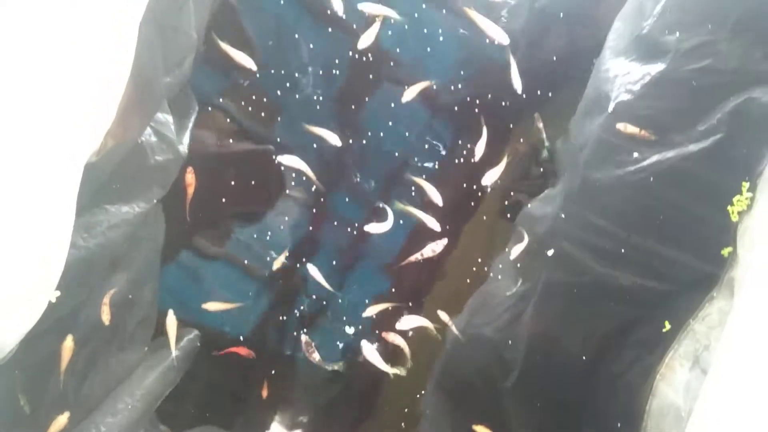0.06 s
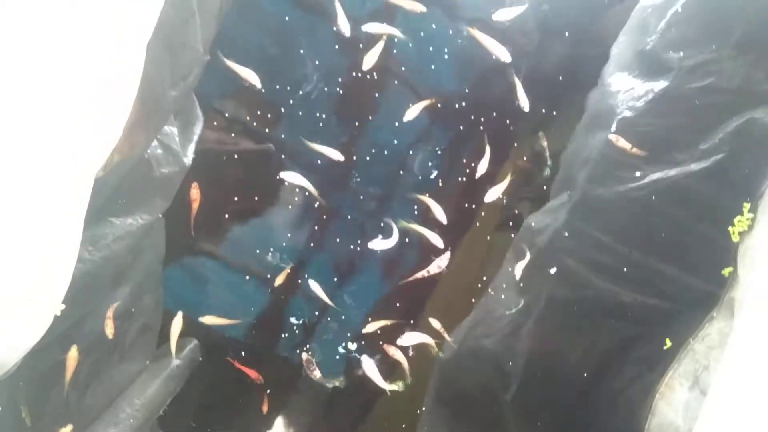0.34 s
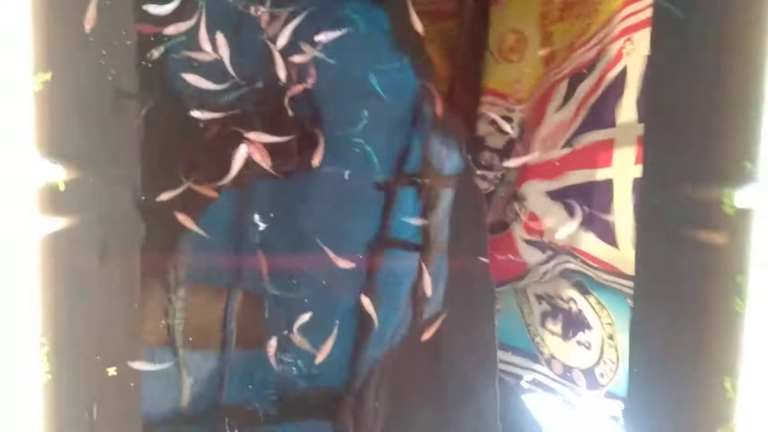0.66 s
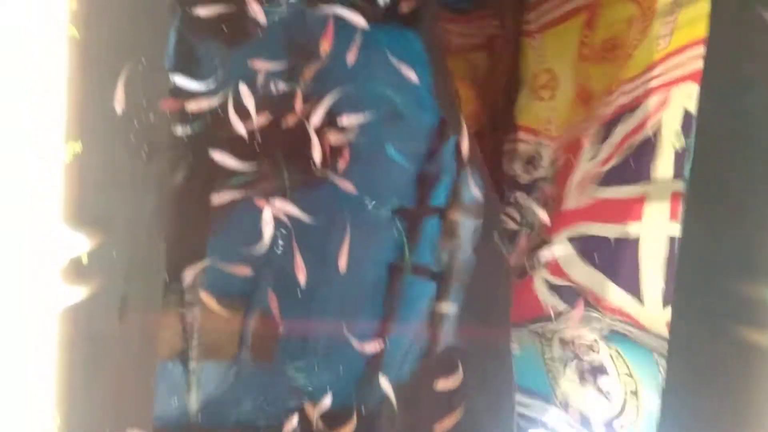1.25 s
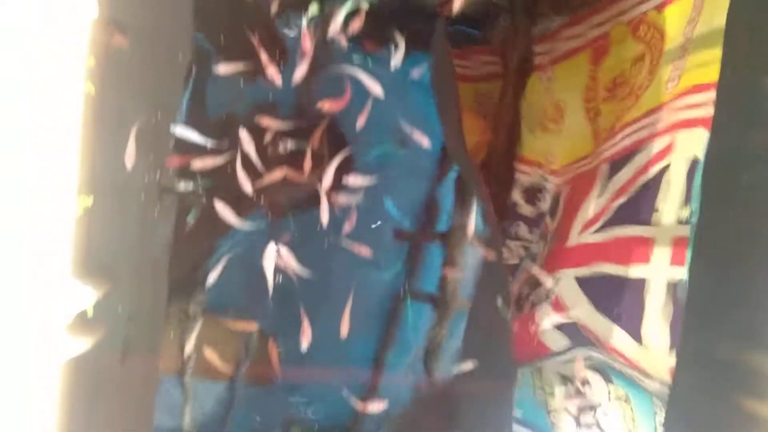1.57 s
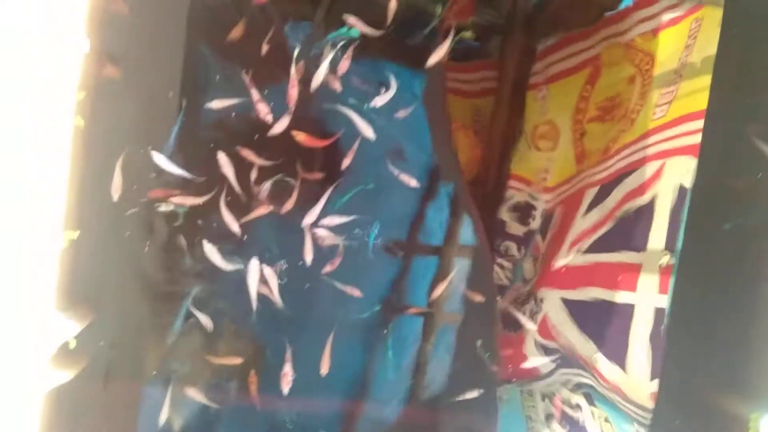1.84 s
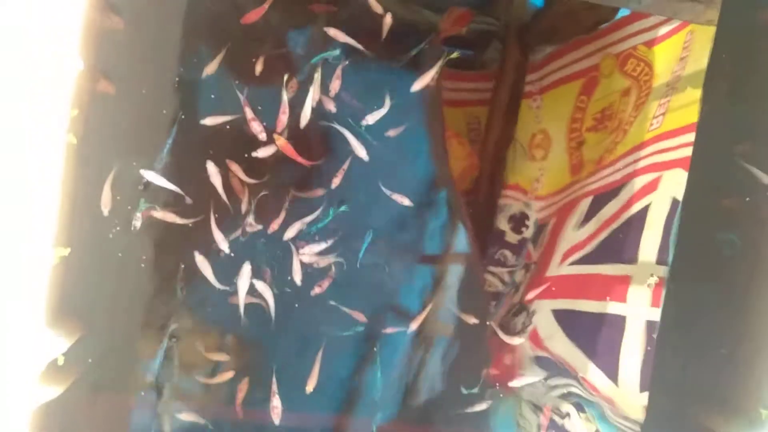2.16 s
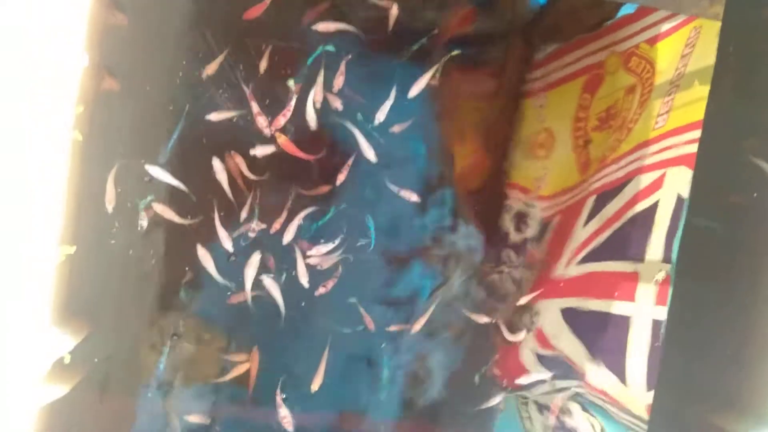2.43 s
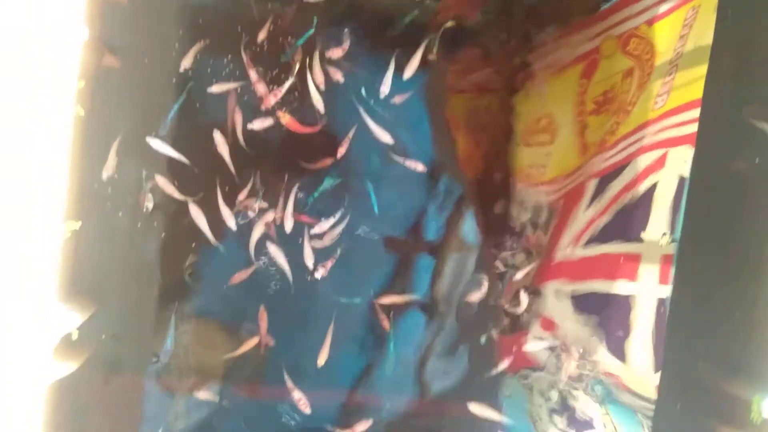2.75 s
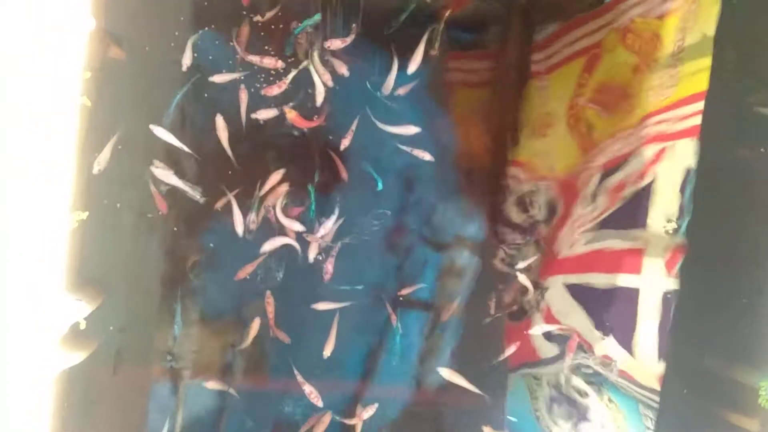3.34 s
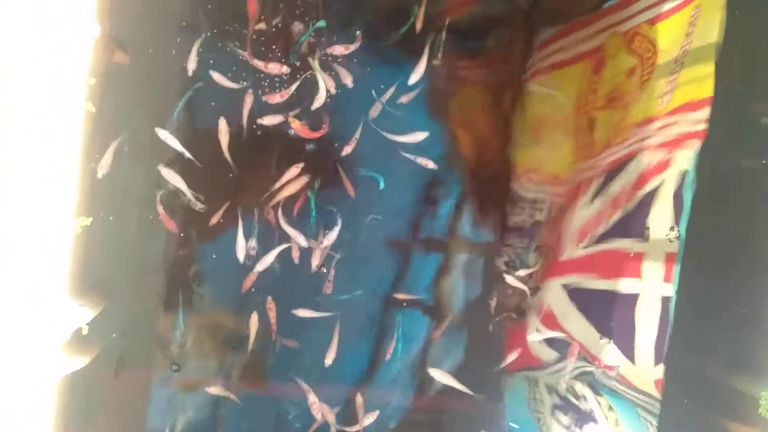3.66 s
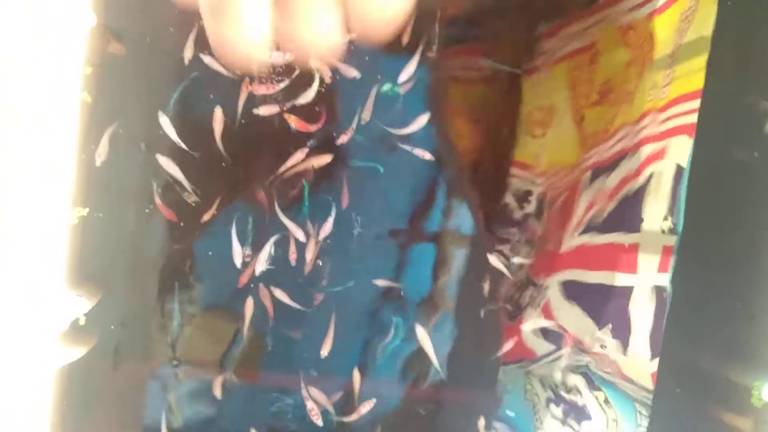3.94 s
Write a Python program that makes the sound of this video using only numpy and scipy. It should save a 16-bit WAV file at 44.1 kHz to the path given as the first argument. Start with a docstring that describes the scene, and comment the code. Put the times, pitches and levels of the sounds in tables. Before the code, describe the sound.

Hissing water splatters in a fish tank, with many small splashes and one hollow gulp.

```python
"""Water splattering by a fish tank

A steady wash of mist and tiny ringing droplets runs under short, bright splashes and one hollow
gulp of air bubbles. The tank's resonances colour the water and nearby walls answer it.
A low rumble and a faint motor hum lie underneath. The highest treble is cut away, and the
sound drops out for a tenth of a second near the start."""
import sys
import numpy as np
from scipy import signal
from scipy.fft import rfft, irfft, next_fast_len
from scipy.io import wavfile
from scipy.ndimage import uniform_filter1d, map_coordinates

SR = 44100
rng = np.random.default_rng(int(sys.argv[2]) if len(sys.argv) > 2 else 0)


def output_pcm(signal):
    """Save a mono or channel-first signal as 16-bit PCM at the path in sys.argv[1].

    Samples are clipped to [-1, 1] before scaling.
    """
    pcm = np.clip(np.atleast_2d(signal).T, -1, 1) * 32767
    wavfile.write(sys.argv[1], SR, np.round(pcm).astype(np.int16))


N = 176400
TOP_HZ = 8005  # ceiling of the mist and of the whole mix


def amp(db):
    """Decibels to gain."""
    return 10 ** (np.asarray(db) / 20)


def unit(x):
    """Scale x to an rms of 1."""
    return x / np.sqrt(np.mean(x ** 2) + 1e-20)


def eq_gain(points, hz):
    """Gain of an EQ curve drawn through (frequency [Hz], level [dB]) points on a log axis."""
    point_hz, point_db = np.transpose(points)
    return amp(np.interp(np.log(hz + 1), np.log(point_hz + 1), point_db))


def wobble(knots_per_s):
    """A smooth random curve for slow drift or quick flutter."""
    position = np.arange(N) * knots_per_s / SR + 2
    return map_coordinates(rng.standard_normal(400), [position], mode="mirror")


def filtered(x, response):
    """Shape the spectrum of x with response(hz)."""
    padded = next_fast_len(len(x) + 8192)
    hz = np.fft.rfftfreq(padded, 1 / SR)
    return irfft(rfft(x, padded) * response(hz), padded)[:len(x)]


def patchy(x, depth_db):
    """Make the tone flicker with random patches of gain in time and frequency."""
    spectrum = signal.stft(x, nperseg=512)[2]
    patches = uniform_filter1d(rng.standard_normal(spectrum.shape), size=8, axis=0)
    patches = uniform_filter1d(patches, size=9, axis=1)
    return signal.istft(spectrum * amp(depth_db * unit(patches)), nperseg=512)[1][:N]


def spray(drops_db, drops_per_s=2900, decay_cycles=5, size_spread_db=3.0):
    """Fine mist plus droplets, each a tiny damped ring; drops_db sets them against the mist."""
    mist = unit(filtered(rng.standard_normal(N), lambda hz: hz < TOP_HZ))
    when, pitch, size = rng.random((12000, 3))[:int(drops_per_s * N / SR)].T
    drop_hz = (500 + 7300 * pitch)[:, None]
    ring_samples = np.arange(400)
    cycles = drop_hz * ring_samples / SR
    size_db = -size_spread_db * np.log(np.maximum(size, .01))  # many small drops, a few big ones
    gain = amp(size_db)[:, None] * np.sqrt(drop_hz)  # short, high rings carry as much energy as low ones
    rings = gain * np.sin(2 * np.pi * cycles) * np.exp(-cycles / decay_cycles)
    positions = (when * N).astype(int)[:, None] + ring_samples
    drops = np.bincount(positions.ravel(), rings.ravel())[:N]
    return unit(mist + amp(drops_db) * unit(drops))


def wash():
    """The steady run of water: a misty spray that swells gently and flutters a little."""
    # tone of the running water: (frequency [Hz], relative level [dB])
    tone = [(150, -15), (300, -0.5), (600, 1), (800, -1), (1050, -2), (1400, 0.07), (1950, -2), (2800, 1),
            (3750, -4), (4400, 1), (5700, -1.7), (6500, -1.5), (8000, 0)]
    # swell of the running water: (time [s], level [dB])
    swell = [(0, -54), (.17, -57.5), (.3, -53.5), (0.471, -57.5), (.7, -54), (1.15, -53), (1.31, -55),
             (1.45, -54), (2.1, -54.5), (2.18, -54.5), (2.4, -53), (2.57, -54.5), (2.82, -54.5),
             (2.95, -54), (3.15, -55), (3.45, -52.5), (3.63, -54.5), (4, -53.5)]
    water = patchy(spray(drops_db=-5), depth_db=1.3)
    water = unit(filtered(water, lambda hz: eq_gain(tone, hz)))
    swell_db = np.interp(np.arange(N) / SR, *np.transpose(swell))
    flutter_db = wobble(knots_per_s=35)
    return water * amp(swell_db + flutter_db)


def splashes(attack_s=0.00095, release_s=0.021):
    """Each splash is a short shower of droplets around one pitch."""
    # splashes: (start [s], time until release [s], relative level [dB], centre [Hz], width [octaves])
    hits = [ (0, 0.016, -59, 4020, 0.36), (.055, 0.03, -56.5, 5760, 0.35), (.1, 0.02, -57.5, 2330, 0.16),
            (.193, 0.02, -51, 5100, 0.22), (.193, 0.02, -59.5, 1410, 0.23), (.27, 0.021, -62.5, 4800, 0.41),
            (.335, 0.061, -52.5, 5830, 0.41), (.405, 0.017, -61, 2880, 0.23),
            (.502, 0.018, -56.5, 6400, 0.16), (.66, 0.056, -52.5, 4550, 0.68),
            (.817, 0.024, -51, 3450, 0.5), (.895, 0.051, -56, 4500, 0.7), (.975, 0.009, -53, 5500, 0.83),
            (1.025, 0.03, -56, 3070, 0.25), (1.09, 0.051, -58, 5000, 0.5), (1.143, 0.024, -48, 4870, 1),
            (1.24, 0.023, -57, 5970, 0.53), (1.345, 0.027, -56, 5000, 0.95),
            (1.415, 0.028, -51.5, 5840, 0.16), (1.42, .03, -63, 1950, 0.16),
            (1.535, 0.026, -57, 2450, 0.27), (1.52, .05, -56, 5500, 0.66), (1.61, .04, -62, 3500, 0.1),
            (1.68, 0.022, -52.5, 5100, 0.57), (1.68, 0.016, -60, 2210, 0.36),
            (1.75, 0.048, -57.5, 5500, 0.4), (1.81, 0.02, -56, 3700, 0.65), (1.88, 0.059, -55, 4600, 0.32),
            (1.98, 0.04, -53.5, 4570, 0.87), (2.03, 0.077, -50.5, 5870, 0.42),
            (2.04, .04, -57.5, 2000, 0.41), (2.2, 0.11, -55.5, 4300, 0.62), (2.277, 0.02, -49, 4000, 0.19),
            (2.32, 0.041, -50, 5000, 0.54), (2.333, 0.011, -54, 2100, 0.28),
            (2.385, 0.059, -51, 5840, 0.47), (2.445, 0.037, -49.5, 5700, 0.29),
            (2.52, .05, -60, 3720, 0.47), (2.605, .03, -52.5, 6120, 0.79),
            (2.638, 0.048, -50.5, 5600, 0.37), (2.645, 0.022, -56, 1500, 0.17),
            (2.65, .03, -57.5, 3400, 0.41), (2.696, 0.017, -45.5, 5200, 0.18),
            (2.73, 0.026, -54, 5400, 0.21), (2.87, 0.067, -56, 5000, 0.97), (3.075, 0.035, -57, 6000, 0.28),
            (3.2, 0.058, -60, 5500, 0.4), (3.357, 0.024, -49.5, 5600, 0.37), (3.359, 0.066, -58, 4150, .07),
            (3.394, 0.021, -50.5, 6300, 0.15), (3.395, .025, -57, 2900, 0.27),
            (3.508, .018, -61, 4250, 0.14), (3.555, 0.018, -58.5, 6000, 0.25),
            (3.673, 0.031, -51.5, 6200, 0.35), (3.75, .02, -57.5, 5500, 0.4), (3.86, 0.11, -66, 5000, 0.52)]
    out, t = np.zeros(N + SR), np.arange(SR // 3) / SR
    shower = np.tile(spray(drops_db=3), 2)
    for i, (start, hold, db, centre_hz, width) in enumerate(hits):
        droplets = shower[i * len(t) % N:][:len(t)]
        band = lambda hz: np.exp(-(np.log2((hz + 1) / centre_hz) / width) ** 2 / 4)
        burst = unit(filtered(droplets, band))
        envelope = np.minimum(t / attack_s, 1) * np.exp(-np.maximum(t - hold, 0) / release_s)
        out[round(start * SR):][:len(t)] += amp(db) * envelope * burst
    return out[:N]


def rumble(level_db=-55):
    """A steady bed of low noise."""
    # tone of the rumble: (frequency [Hz], relative level [dB])
    tone = [(20, -24), (35, -19.5), (48, -4.5), (70, -1), (100, -4.5), (140, 1), (170, -7), (215, -13.5),
            (270, -11), (345, -10), (450, -12), (650, -13.5), (1200, -31.5), (4000, -66.5)]
    return amp(level_db) * unit(filtered(rng.standard_normal(N), lambda hz: eq_gain(tone, hz)))


def motor_hum(waver_db=0.79, waver_rad=0.41):
    """A motor, likely a pump, hums in faint tones that waver in level and phase."""
    # tones of the motor: (frequency [Hz], rms level [dB])
    partials = [(100, -63), (300, -72.5), (348, -71.5)]
    hum, t = np.zeros(N), np.arange(N) / SR
    for hz, db in partials:
        peak = np.sqrt(2) * amp(db + waver_db * wobble(knots_per_s=5))
        hum += peak * np.sin(2 * np.pi * hz * t + waver_rad * wobble(knots_per_s=8.5))
    return hum


def gulp(attack_s=0.0035):
    """A gulp of air: each large bubble rings briefly at its own hollow pitch."""
    # air bubbles: (start [s], pitch [Hz], level [dB], time to fade by 60 dB [s])
    bubbles = [(1.863, 600, -49, 0.18), (1.865, 740, -45.5, 0.085)]
    out, t = np.zeros(N + SR), np.arange(SR // 3) / SR
    for start, hz, db, t60 in bubbles:
        envelope = (1 - np.exp(-t / attack_s)) * np.exp(-np.log(1000) * t / t60)
        out[round(start * SR):][:len(t)] += amp(db) * envelope * np.sin(2 * np.pi * hz * t)
    return out[:N]


def tank(water):
    """The tank's resonances colour the water in narrow bands."""
    # resonances of the tank: (centre [Hz], width [Hz], gain [dB])
    resonances = [(1373, 160, 4.5), (1720, 44, 7), (3030, 20, 3), (3740, 17, -0.5), (4160, 24, 6),
                  (4070, 15, 0), (4600, 20, 0), (5170, 13, 1.5), (5910, 60, 4.5), (6570, 21, 6)]

    def response(hz):
        return 1 + sum((amp(db) - 1) * 1j * hz * width / (centre ** 2 - hz ** 2 + 1j * hz * width)
                       for centre, width, db in resonances)
    return filtered(water, response)


def room(x, t60_s=0.23, wet_db=-8.5):
    """Nearby walls answer with a short, diffuse tail."""
    t = np.arange(SR // 2) / SR
    tail = rng.standard_normal(len(t)) * np.exp(-np.log(1000) * t / t60_s)
    return x + amp(wet_db) * signal.fftconvolve(x, tail / np.linalg.norm(tail))[:N]


def scene():
    """Water through tank and room, over rumble and hum, alike in both channels."""
    splash_trim_db = 0.82
    water = wash() + amp(splash_trim_db) * splashes() + gulp()
    mono = room(tank(water)) + rumble() + motor_hum()
    return np.array([mono, mono])


def record(dry):
    """The sound drops out briefly, and the highest treble falls away steeply."""
    # treble roll-off: (frequency [Hz], gain [dB])
    rolloff = [(6500, 0), (6800, -2), (7050, -7), (7300, -17), (7600, -31), (7900, -50), (8100, -100)]
    dropout_start_s, dropout_end_s = .524, .632
    t = np.arange(N) / SR
    audible = (t < dropout_start_s) | (t > dropout_end_s)
    high_cut = lambda hz: eq_gain(rolloff, hz) * (hz < TOP_HZ)
    return np.array([filtered(channel * audible, high_cut) for channel in dry])


dry = scene()
out = record(dry)
output_pcm(out)
```